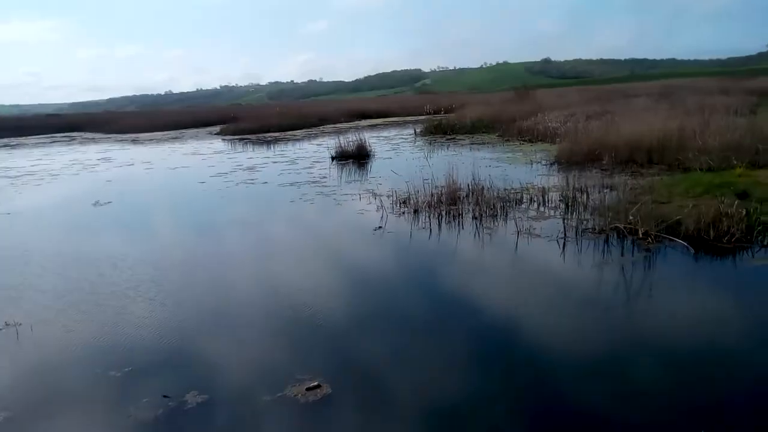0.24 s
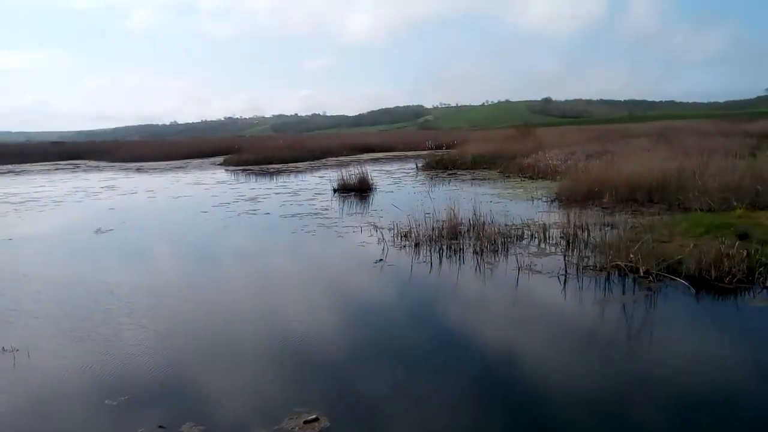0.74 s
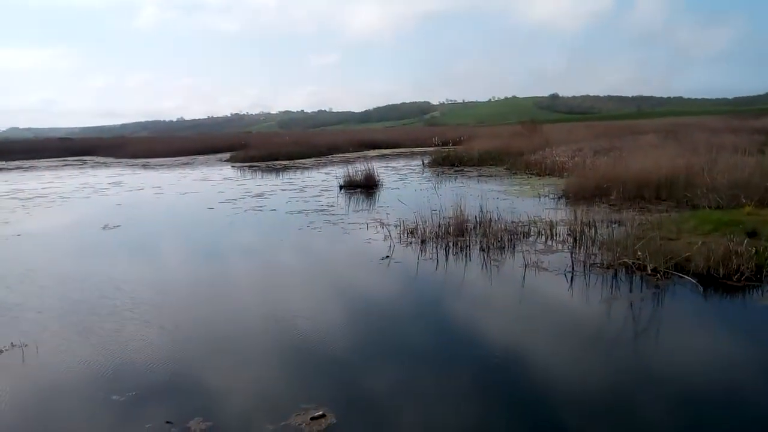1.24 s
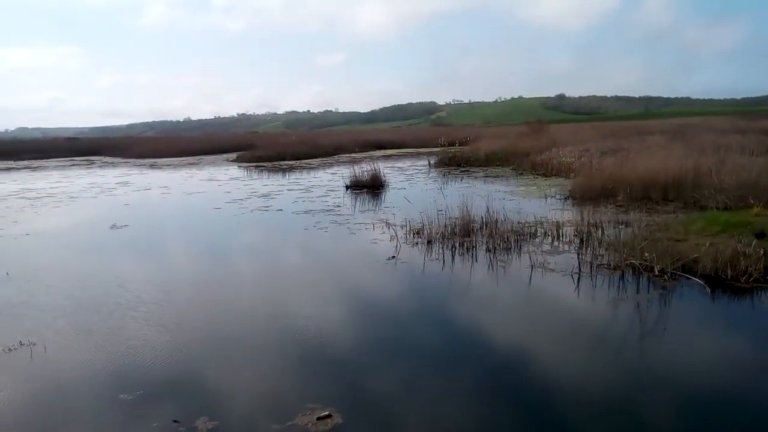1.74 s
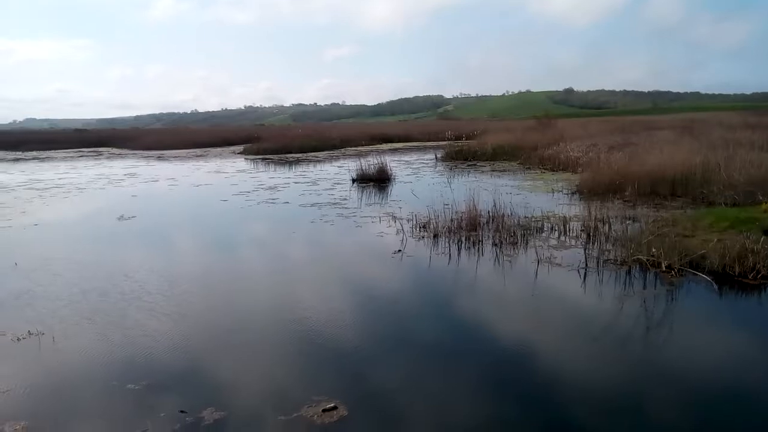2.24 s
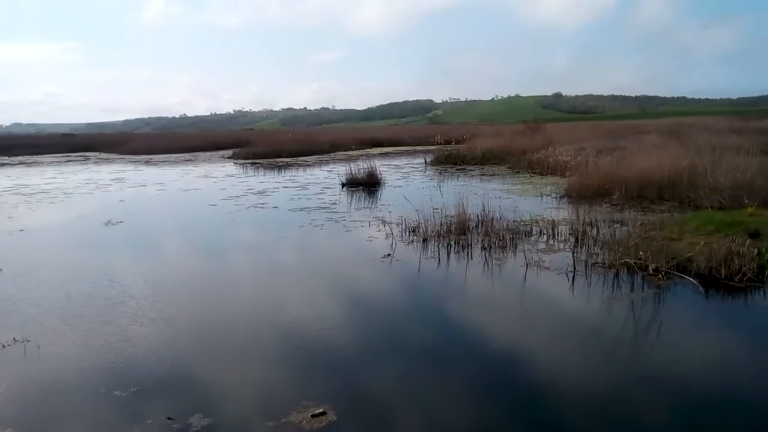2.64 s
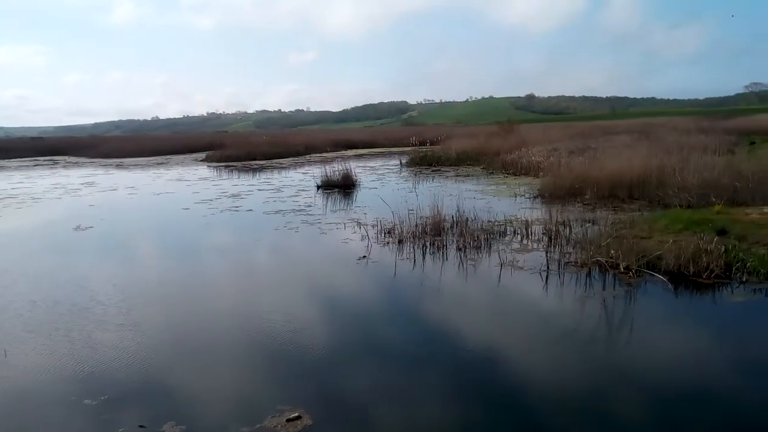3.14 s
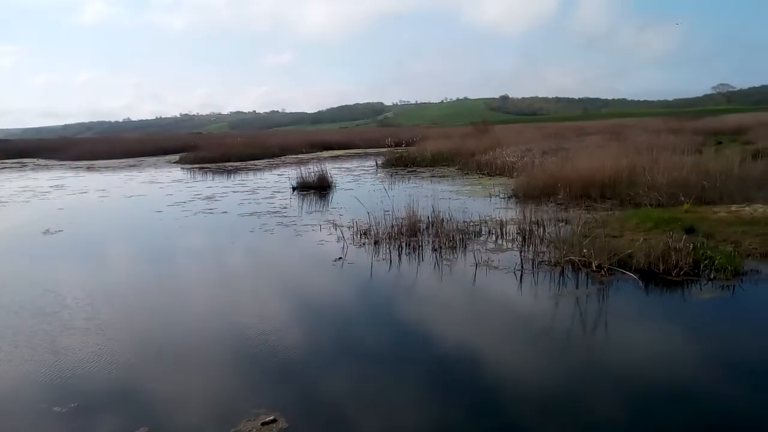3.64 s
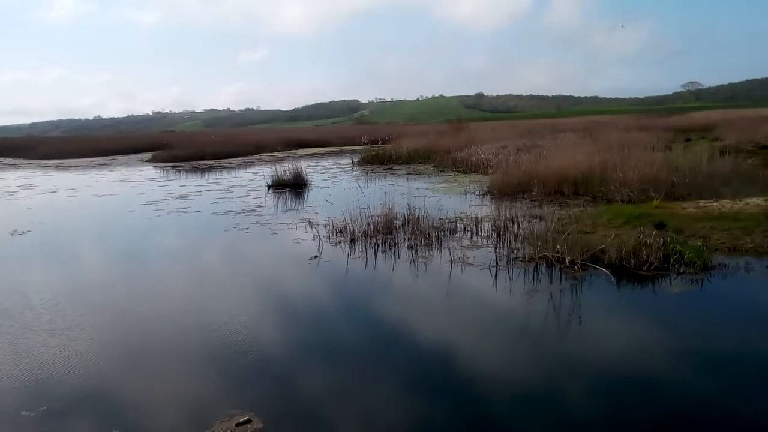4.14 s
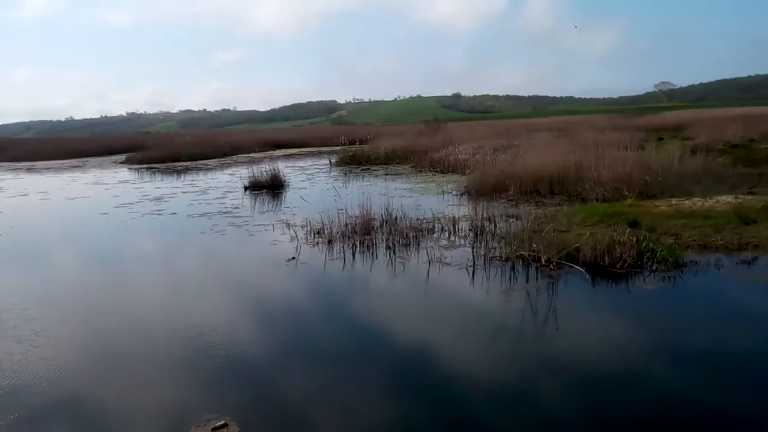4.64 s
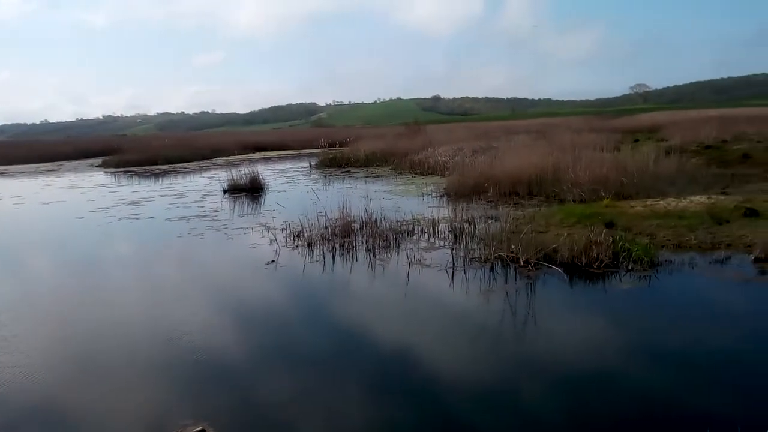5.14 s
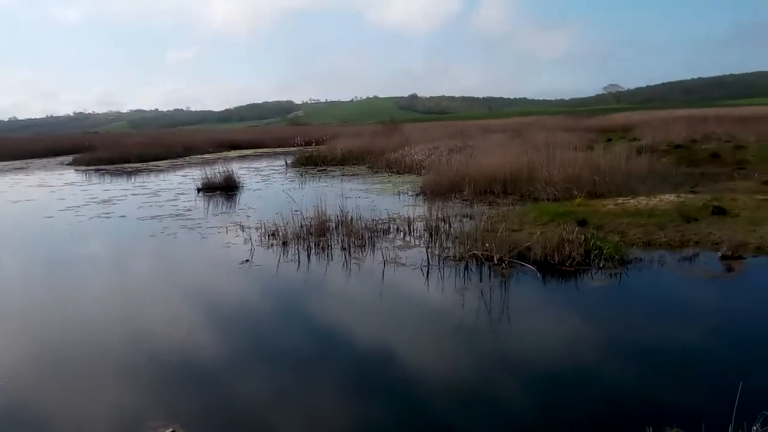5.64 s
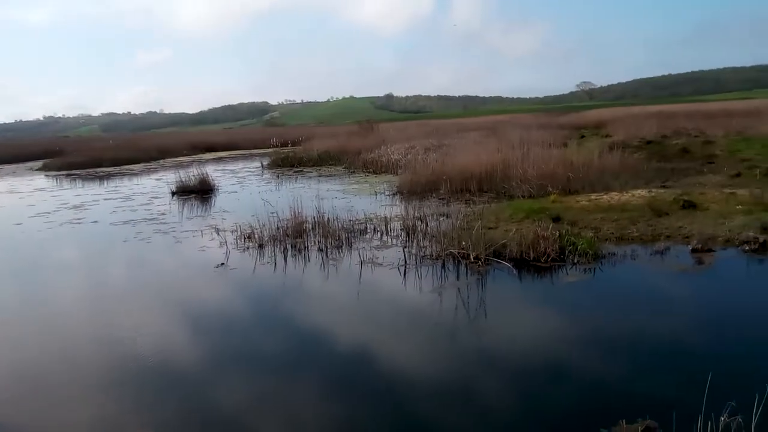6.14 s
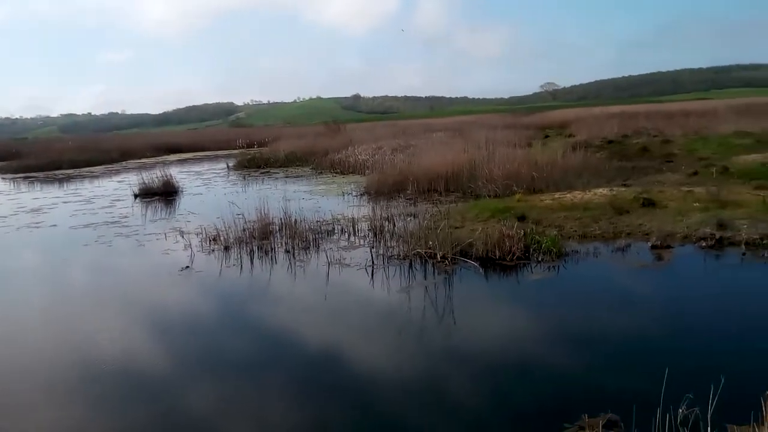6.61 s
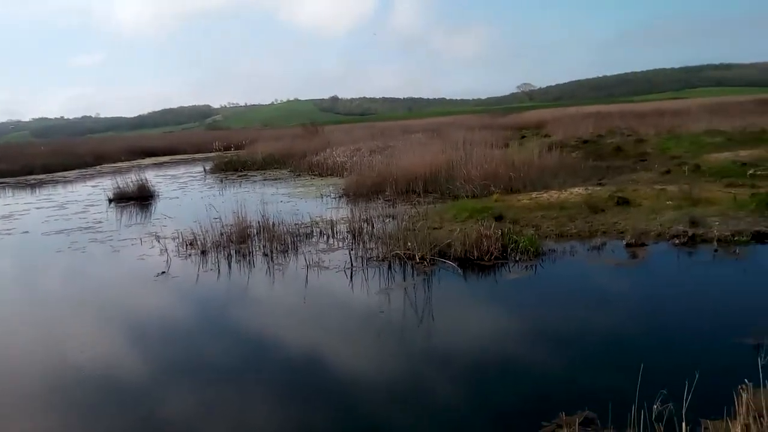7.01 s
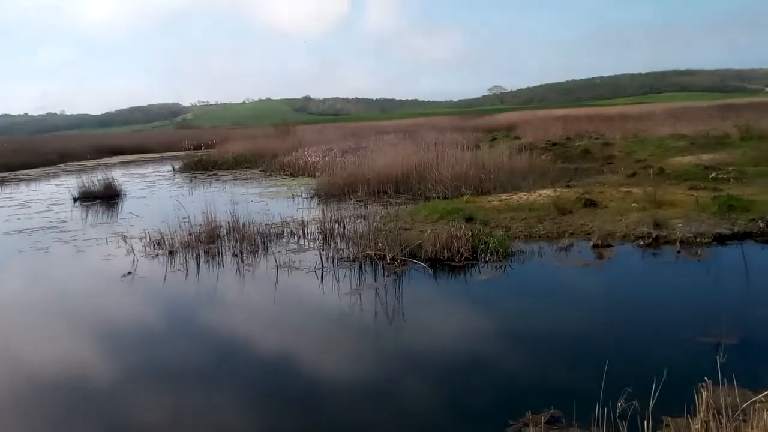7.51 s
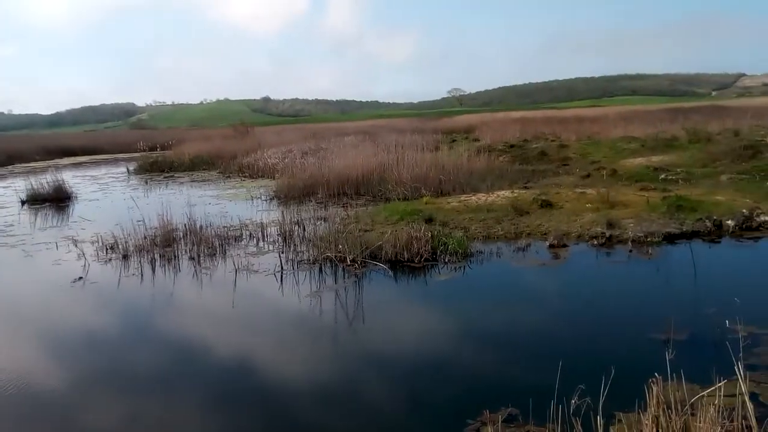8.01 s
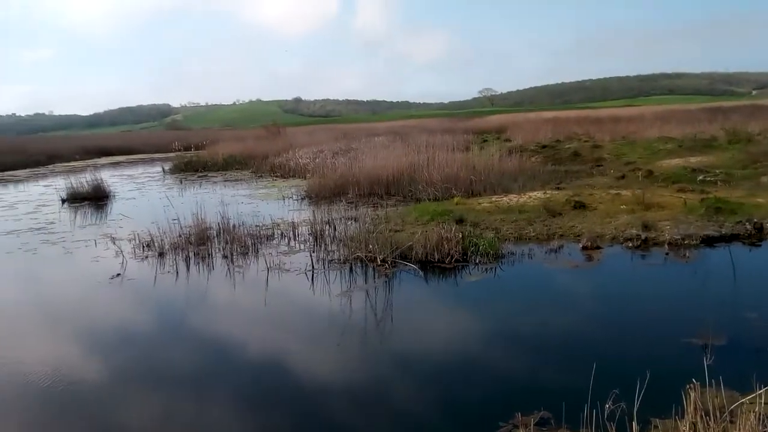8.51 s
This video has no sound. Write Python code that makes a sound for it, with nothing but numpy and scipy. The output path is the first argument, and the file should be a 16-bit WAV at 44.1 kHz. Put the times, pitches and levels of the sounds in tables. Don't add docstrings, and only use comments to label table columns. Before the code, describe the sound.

A dense frog chorus fills an open, reedy pond from start to end. Near frogs rattle in series of short, dry, pulsed notes, roughly twelve a second, bright around four kilohertz with a hollow throaty ring. Smaller frogs add slightly higher notes and faint husky whistles, and short croaks climb quickly in pitch and stop abruptly. A thin rising peep sounds at about 2.2 seconds. Behind, countless distant callers merge into fluttering drone and buzz, with soft scattered echoes. Wind buffets the small microphone: low rumbling gusts in the first 1.3 seconds, a calmer stretch to about 2.6, light bumps, then heavy thudding gusts from 3.8 to 5. More blows come at 5.2 to 6.1, strongest near 5.8. After an easier spell, the hardest jolts hit around 7.85, with another near 8.3. The limiter ducks the frogs at the worst peaks, with tiny electronic ticks. Chorus continues to 8.8.

```python
import sys
import numpy as np
from scipy import signal
from scipy.fft import rfft, irfft, next_fast_len
from scipy.io import wavfile
from scipy.ndimage import uniform_filter1d, minimum_filter1d, map_coordinates

SR = 44100
rng = np.random.default_rng(int(sys.argv[2]) if len(sys.argv) > 2 else 0)


def master(y):
    cut = np.clip(np.atleast_2d(y).T, -1, 1)
    pcm = np.round(cut * 32767)
    wavfile.write(sys.argv[1], SR, pcm.astype(np.int16))


def convert_level_to_amplitude(level_db):
    exponent = np.asarray(level_db, float) / 20
    return 10 ** exponent


N = 386757

# [first note t/s, last note t/s, gap/s, first level/dB, last level/dB]
LEADER_SERIES = [(0.018, 0.28, .082, -42.5, -40), (0.365, 0.68, .079, -48.5, -44),
                 (0.831, 1.086, .086, -51, -39), (1.182, 1.4616, .094, -35, -32),
                 (1.596, 2.14, .079, -38.5, -33), (2.44, 2.66, .073, -32.5, -26),
                 (2.739, 2.899, .079, -27.5, -33.5), (2.948, 3.102, .082, -36.5, -63),
                 (3.294, 3.677, .077, -30.5, -27.5), (3.836, 3.914, .075, -47, -47),
                 (3.988, 4.53, .077, -35, -29.5), (4.572, 4.615, .043, -34.5, -41),
                 (4.705, 4.705, .08, -40, -38), (4.81, 4.965, .078, -35, -33),
                 (5.043, 5.523, .08, -32.5, -29.5), (5.569, 5.95, .076, -36.5, -47),
                 (6.015, 6.204, .093, -48, -51), (6.266, 6.63, .073, -40.5, -34.5),
                 (6.67, 7.012, .085, -36, -30.5), (7.09, 7.25, .08, -43, -48),
                 (7.582, 7.97, .077, -40.5, -39.5), (8.034, 8.26, .073, -45.5, -73),
                 (8.331, 8.413, .08, -43, -39), (8.475, 8.723, .083, -39, -40.5)]
BRIGHT_SERIES = [
    (.09, .19, .1, -51, -52),
    (1.6, 1.75, .075, -54, -40),
    (5.362, 5.447, .085, -27.5, -28.5),
    (5.874, 5.95, .076, -49, -45.5),
    (6.55, 6.68, .065, -45, -47),
    (6.755, 7.203, .075, -40, -45),
    (8.41, 8.41, .08, -47, -48),
]
# [t/s, upper resonance f/Hz, then vocal sac, middle, top resonance level/dB re upper]
THROAT_SHAPE = [(.1, 4260, 4.5, -4, -21), (.52, 4520, 8.5, -4, -27), (.9, 4920, 8, -10, -27),
                (1.3, 4300, 2.5, -7.5, -43), (1.62, 4560, 4.5, -1.5, -27), (1.95, 4315, -0.5, -9, -36),
                (2.6, 4378, -3, -10, -44), (3.05, 4366, 5, -4, -38), (3.49, 4352, -5.5, -5, -45),
                (4.18, 4280, -1.5, 1.5, -31), (4.55, 4390, -3, -5, -34), (4.9, 4400, -13, -0.5, -28),
                (5.35, 4330, -2, -9, -37), (5.85, 4388, -11, 2.5, -18), (6.21, 4426, 2.5, 1, -20),
                (6.7, 4283, -6.5, -11.5, -31.5), (7.9, 4460, -6, 2.5, -27), (8.5, 4470, 6.5, 0.5, -27)]
# [first note t/s, last note t/s, first level/dB, last level/dB, f/Hz]
SMALL_SERIES = [(.29, .29, -38, -38, 5100), (.362, .676, -36.5, -37, 4960), (.823, .823, -48, -44, 4850),
                (.909, 1.089, -42.5, -52, 5010), (1.143, 1.143, -40, -45, 4745),
                (1.688, 2.165, -36.5, -30, 4890), (3.026, 3.34, -39, -30.5, 4994),
                (3.425, 3.578, -31, -35.5, 4940), (3.66, 3.66, -35.5, -42, 4790),
                (4.672, 4.747, -38.5, -32.5, 4930), (4.826, 5.148, -28.5, -31.5, 4887),
                (5.23, 5.55, -38, -63, 5067), (5.793, 6.12, -56, -47, 4958), (6.6, 6.685, -42, -44, 5036),
                (8.175, 8.409, -40.5, -43, 4812)]
# [t/s, level/dB, f/Hz]
CLEAR_NOTES = [(.07, -43, 4360), (0.2, -36, 4320), (0.26, -36.5, 3800), (7.06, -33.5, 4320),
               (6.5, -35, 4400), (7.4, -41, 4600), (7.2, -40, 3900), (1, -40.5, 3730), (3.225, -29, 4310),
               (4.7, -36, 4300), (.1, -52, 4800), (1.52, -38, 4200), (2.62, -33, 4450), (2.55, -39, 5130),
               (3.005, -43, 5110), (.065, -42, 3400), (0.21, -47, 3650), (1.9, -41, 4300), (1.7, -38, 4400),
               (4.6, -36, 4600), (3.14, -42, 5470), (2.2, -51, 4700)]
# [first note t/s, last note t/s, level/dB, first f/Hz, last f/Hz]
WHISTLE_SERIES = [(.82, .89, -51, 5520, 5580), (1.205, 1.205, -59, 6570, 6400),
                  (1.275, 1.598, -56, 6510, 5820), (1.67, 1.67, -61, 7970, 8000),
                  (1.83, 2.15, -70, 8670, 8450), (2.51, 2.66, -76, 8740, 8500),
                  (2.74, 2.89, -70, 8340, 8080), (3.3, 3.3, -78, 8900, 8900), (3.37, 3.68, -72, 9000, 8280),
                  (3.611, 3.925, -56.5, 6540, 5900), (4.38, 4.525, -67, 8300, 7980),
                  (4.57, 4.57, -75, 8550, 8550), (4.956, 5.195, -69.5, 8800, 8340),
                  (5.364, 5.448, -59.5, 8100, 8080), (5.52, 5.52, -75, 8370, 8500),
                  (6.03, 6.117, -55, 6500, 6650), (6.192, 6.441, -57, 6370, 5890),
                  (6.752, 6.925, -76.5, 8600, 8900), (7.873, 8.019, -52.5, 6580, 6310),
                  (8.105, 8.262, -53.5, 6290, 6100)]
# [start t/s, length/s, level/dB, first f/Hz, last f/Hz]
PEEPS = [
    (2.245, 0.096, -40, 2110, 2300),
    (3.3, 0.033, -38, 1900, 2000),
    (4.855, .035, -62, 3550, 3100),
    (3.5, .05, -46, 2600, 3900),
]
# [start t/s, level/dB, length/s, start f/Hz, end f/Hz]
CROAKS = [(.3, -31, 0.17, 1160, 1760), (.66, -34, 0.063, 1700, 1850), (8.65, -32.5, 0.09, 1950, 1900),
          (7.24, -35, 0.075, 1800, 1910), (8.1, -31, .3, 1247, 1352), (.55, -25, 0.086, 1610, 1746),
          (.8, -29, 0.11, 1780, 2070), (.99, -29, 0.13, 1175, 1870), (1.58, -27.5, 0.17, 1130, 1830),
          (2.35, -27.5, 0.14, 1471, 1893), (2.55, -30.5, 0.075, 1020, 1810), (3.22, -36, 0.18, 1050, 1370),
          (3.38, -25.5, 0.11, 1428, 1805), (3.67, -24, 0.067, 2480, 2190), (3.95, -27, 0.12, 1416, 1868),
          (5.25, -32, 0.18, 1214, 1391), (5.47, -29, 0.066, 1202, 1455), (5.79, -33.5, 0.15, 1196, 1849),
          (6.1, -28.5, 0.12, 1195, 1497), (6.41, -29, 0.12, 1640, 1984), (6.8, -28, 0.12, 1382, 1952),
          (7.12, -34, 0.12, 2270, 2065), (6.97, -22.5, 0.059, 1750, 2005), (7.52, -25.5, 0.152, 1199, 1910),
          (5.68, -34, 0.059, 1607, 1792), (6.25, -36.5, .12, 1644, 1850), (6.6, -31, 0.043, 1800, 1903),
          (8.02, -33, .07, 2140, 1600), (7.93, -36, 0.033, 2100, 2150), (8.1, -35, 0.031, 2106, 2150),
          (6.88, -29, 0.084, 1730, 1900), (8.13, -25, 0.11, 1114, 1884), (8.3, -31, 0.1, 1134, 1491)]
# [t/s, croaking level/dB, rattling level/dB]
FAR_LEVELS = [(0, -34, -40), (.96, -39.5, -43), (1.63, -34, -39), (2.06, -39.5, -44.5), (2.45, -34.5, -41),
              (3.09, -38.5, -44.5), (3.3, -36.5, -41), (3.66, -38.5, -41), (3.8, -36.5, -44.5),
              (4.25, -37.5, -50.5), (5.0, -37, -35.5), (6.03, -38, -45.5), (6.99, -36, -42),
              (7.38, -40, -52.5), (7.65, -33.5, -42), (7.86, -39.5, -50), (8.14, -34, -46.5),
              (8.76, -38.5, -42)]
# [f/Hz, level/dB]
DRONE_SPECTRUM = [(330, -34.5), (480, -6.5), (620, -9), (850, -11), (1250, -5), (1750, 1), (2300, -5),
                  (2900, -17.5), (3800, -41.5)]
# [f/Hz, level/dB]
BUZZ_SPECTRUM = [(2600, -31.5), (3300, -4), (4300, -4.5), (5200, -6.5), (5800, -13.5), (6600, -17),
                 (7600, -26), (8500, -53)]
# [t/s, buffet level/dB]
BREEZE_LEVELS = [(0, -37.5), (.3, -40), (.65, -35), (1.05, -42), (1.6, -38), (1.93, -54), (2.5, -44),
                 (3.3, -40), (3.7, -33), (4.9, -35.5), (5.13, -37.5), (5.5, -32.5), (6.3, -38.5),
                 (7.2, -40), (7.8, -33.5), (8.76, -33.5)]
# [start t/s, hold/s, buffet level/dB, sharp part level/dB re
GUSTS = [(0, 0.19, -25, -9.5), (0.494, 0.063, -33, -10), (0.692, 0.11, -26, -13), (0.891, 0.033, -32, -19),
         (1.126, 0.0497, -25, -12), (1.258, 0.37, -35, -15), (2.618, 0.04, -30, -21),
         (2.743, 0.048, -30, -15), (2.993, 0.072, -28, -16), (3.385, 0.12, -28, -13),
         (3.789, 0.07, -20, -7), (3.878, 0.17, -17, -5.5), (4.089, .17, -13.5, -6.5),
         (4.272, 0.058, -20, -21), (4.355, 0.086, -17, -18), (4.474, 0.053, -22, 0.5),
         (4.592, .23, -23, -11), (5.184, 0.22, -28, -13), (5.581, 0.035, -25, -14),
         (5.713, .05, -21.5, -9.5), (5.776, 0.11, -15.5, -9), (5.915, .11, -22.5, -9.5),
         (6.107, 0.041, -24.5, -10.5), (7.078, 0.019, -29.5, -8), (7.447, 0.062, -32.5, -14),
         (7.816, 0.13, -19, -1.5), (8.135, 0.091, -27.5, -15.5), (8.33, 0.086, -20, -4),
         (8.476, 0.051, -28, -18),
         (0.114, 0.047, -23, -9), (0.575, 0.057, -32, -9.5), (0.843, 0.042, -35, -16),
         (1.249, 0.069, -30, -6), (1.354, 0.13, -28.5, -13), (1.517, 0.022, -32, -6.5),
         (1.574, 0.038, -30, -16), (1.713, 0.031, -40, -16), (1.789, 0.036, -38, -17),
         (2.077, 0.1, -39, -18), (2.305, 0.065, -39, -22), (2.41, .14, -37, -28), (3.459, .045, -31.5, -5),
         (2.7, 0.021, -32, -15), (3.105, 0.017, -33, -13), (3.154, 0.019, -33, -15),
         (3.253, 0.026, -36, -10), (3.544, 0.028, -33, -15), (3.638, 0.093, -31, -21),
         (4.543, 0.043, -22, -6.5), (4.624, 0.0302, -16, -6), (4.688, 0.051, -19, -7),
         (4.775, 0.046, -19, -8), (4.877, 0.013, -29.5, -14.5), (5.104, 0.025, -32, -14.5),
         (5.176, 0.057, -22, -14), (5.276, 0.021, -24, -17), (5.329, 0.031, -23, -6),
         (5.42, 0.067, -30, -12), (6.02, .022, -23.5, -9), (6.465, .047, -34, -19),
         (6.799, 0.038, -37.5, -19), (6.999, 0.036, -32.5, -18), (7.571, 0.048, -29.5, -16),
         (7.692, .035, -31, -10), (8.606, 0.057, -32, -12.5), (8.722, 0.056, -32.5, -19)]
# [t/s, peak level/dB, f/Hz]
JOLTS = [(.08, -20, 180), (.145, -17.5, 150), (2.635, -27, 150), (3.02, -24, 149), (3.41, -22, 150),
         (3.47, -25, 160), (3.815, -10.5, 227), (3.828, -11.5, 200), (3.915, -11.5, 190), (3.944, -10, 170),
         (4.02, -6.5, 189.8), (4.035, -10, 230), (4.095, -15, 230), (4.111, -7, 170), (4.165, -14.5, 220),
         (4.19, -8.5, 221), (4.238, -6, 180), (4.252, -4.5, 170), (4.408, -11.5, 149), (4.486, -19.5, 240),
         (4.504, -3.5, 242.5), (4.615, -15, 220), (4.64, -6, 150.4), (4.73, -15.5, 189.7),
         (4.805, -14, 210), (5.196, -20, 180), (5.274, -26.5, 159), (5.33, -22, 150), (5.602, -24, 140),
         (5.718, -18.5, 169), (5.785, -13.5, 160), (5.801, -4.5, 209), (5.955, -19.5, 200),
         (6.024, -22, 188.7), (6.12, -23, 170), (7.09, -22.5, 191), (7.843, -4.5, 201), (7.858, -1, 189),
         (7.872, 0, 193), (7.901, -8.5, 170), (7.915, -11, 170.3), (7.956, -16, 210), (8.36, -14.5, 165)]
# [f/Hz, level/dB]
BUFFET_SPECTRUM = [(20, -21), (45, -8.5), (75, 2.5), (110, 1.5), (160, -3), (230, -15), (400, -45.5)]
# [f/Hz, level/dB]
SHARP_SPECTRUM = [(120, -0.5), (220, 2.5), (320, -8), (500, -15.5), (800, -26), (1200, -39)]
# [f/Hz, level/dB]
RUMBLE_SPECTRUM = [(110, -23.5), (200, -13), (330, -12.5), (440, -3.5), (620, 0), (900, -9.5),
                   (1200, -18.5)]
# [f/Hz, level/dB]
HISS_SPECTRUM = [(300, -0.5), (9000, -8.5), (12000, -8.5), (13700, -11.5), (14500, 2), (15500, 0.5)]
# [t/s, peak level/dB]
TICKS = [
    (3.813, -38),
    (4.013, -40),
    (4.192, -39),
    (4.232, -48),
    (4.252, -37),
    (4.8, -44),
    (6.664, -36),
]

SWELL_DB, SWELL_NOTES, UNEVEN_DB = 3.5, 1.56, 0.95
NOTE_GAP_S = 0.08
GUST_RISE_DB_PER_S, GUST_FALL_DB_PER_S, BREEZE_SHARP_DB = 901, 700.5, -16.5
GUST_EVENNESS = 0.3
RUMBLE_DB = -53.5


def rattle(rows, bright_db):
    s, done, swell_db, _, first_db, last_db = series(rows, np.transpose(rows)[2])[:, :, None]
    db = first_db + (last_db - first_db) * done + swell_db
    at, *shape = np.transpose(THROAT_SHAPE)
    upper_hz, sac_db, mid_db, top_db = (np.interp(s, at, column) for column in shape)
    t, u = train(s - .028, .056, rate=385, jitter=.028, slowing=.24, count=22)
    size = convert_level_to_amplitude(db + 6.5) * np.sin(np.pi * u ** 0.85) ** 1.33
    size = size * scatter(u, 2.5 * u)

    def spread(hz):
        return hz * rng.standard_normal(s.shape)

    sound = rings(t, size, upper_hz * (1.015 - 0.041 * u) + spread(40), life=0.001, sag=0.0073)
    size = size * np.sin(np.pi * u) ** 0.25
    sound += rings(t, size * convert_level_to_amplitude(-4.0) * scatter(s, 1.6), 3800 + spread(80), life=0.0008, sag=0.0089)
    sound += rings(t, size * convert_level_to_amplitude(-15.5) * scatter(u, 3.9), 4900 + spread(85), life=0.0007, sag=0.11)
    sac_size = size * convert_level_to_amplitude(sac_db) * scatter(u, 0.75)
    sac_hz = 2370 - 160 * u + spread(66) + 35 * rng.standard_normal(u.shape)
    sound += rings(t, sac_size, sac_hz, life=0.0011, sag=0.016)
    sound += rings(t, size * convert_level_to_amplitude(mid_db) * scatter(u, 1), 3300 + spread(70), life=0.00057, sag=0.0037)
    top_size = size * convert_level_to_amplitude(top_db + bright_db) * scatter(u, 2.5)
    sound += rings(t, top_size, 6750 + spread(140), life=0.00035, sag=0.05)
    sound += rings(t, size * convert_level_to_amplitude(-46.5) * scatter(s, 3), 14800 + spread(250), life=.0003)
    edge_size = size * convert_level_to_amplitude(-43.5 + .5 * bright_db) * scatter(s, 3.1)
    return sound + rings(t, edge_size, 10600 + spread(400), life=0.00023)


def small_frog():
    s, done, swell_db, first_db, last_db, hz = series(SMALL_SERIES, NOTE_GAP_S)
    db = first_db + (last_db - first_db) * done + swell_db
    hz = hz * (1 + 0.006 * rng.standard_normal(len(s)))
    series_count = len(s)
    s, db, hz = np.hstack([[s, db, hz], np.transpose(CLEAR_NOTES)])[:, :, None]
    rough = np.where(np.arange(len(s)) < series_count, 1, .2)[:, None]
    t, u = train(s - .022, .03 + .016 * rough, rate=520, jitter=.022 * rough, slowing=.38, count=26)
    size = convert_level_to_amplitude(db + 1.5) * np.sin(np.pi * u ** 1.23) ** 0.52
    size = size * scatter(u, (1 + 3 * u) * rough)
    sound = rings(t, size, hz * (1.02 - 0.048 * u), life=0.00096, sag=0.017)
    sound += rings(t, size * convert_level_to_amplitude(1.5), 2350 + 60 * rng.standard_normal(s.shape), life=0.00072)
    sound += rings(t, size * convert_level_to_amplitude(-39), 2.1 * hz, life=.0003)
    sound += rings(t, size * convert_level_to_amplitude(-19.0), 1.3 * hz, life=0.00023)
    sound += rings(t, size * convert_level_to_amplitude(-2.5) * scatter(s, 2.5), 0.815 * hz, life=0.00038)
    return sound + rings(t, size * convert_level_to_amplitude(-1.5) * scatter(s, 2.2), 0.652 * hz, life=0.00047)


def whistles():
    out = np.zeros(N + SR)
    t = np.arange(int(0.046 * SR)) / SR
    u = t / t[-1]
    throb = 1 + .7 * np.sin(2 * np.pi * 335 * t)
    at, done, swell_db, level_db, first_hz, last_hz = series(WHISTLE_SERIES, NOTE_GAP_S)
    for s, db, hz in zip(at, level_db + swell_db, first_hz + (last_hz - first_hz) * done):
        drift, husk = uniform_filter1d(rng.standard_normal((2, len(t))), size=130, axis=1)
        phase = 2 * np.pi * np.cumsum(hz * (1.008 - 0.022 * u) + 900 * drift) / SR
        fundamental = (5700 < hz < 7000) * convert_level_to_amplitude(11) * np.sin(phase / 3)
        tone = throb * (1 + 3 * husk) * np.sin(phase) + fundamental
        out[round((s - .022) * SR):][:len(t)] += convert_level_to_amplitude(db + 3.5) * np.sin(np.pi * u) * tone
    for s, length, db, hz, end_hz in PEEPS:
        u = np.linspace(0, 1, int(length * SR))
        phase = 2 * np.pi * np.cumsum(hz + (end_hz - hz) * u) / SR
        tone = np.sin(phase) + convert_level_to_amplitude(-9) * np.sin(2 * phase)
        out[round(s * SR):][:len(u)] += convert_level_to_amplitude(db) * np.sin(np.pi * u) ** 0.69 * tone
    return out[:N]


def croak(rows):
    s, db, length, hz, top_hz = np.transpose(rows)[:, :, None]
    t, u = train(s, length, rate=215, jitter=.02, slowing=-.5, count=48)
    size = convert_level_to_amplitude(db - 1.5) * np.sin(np.pi * u ** 2.0) ** 0.33 * scatter(u, 2.0)
    climb = .5 * u + .5 * (3 * u ** 2 - 2 * u ** 3)
    sac = rings(t, size, hz + (top_hz - hz) * climb, life=0.0019)
    return sac + rings(t, size * convert_level_to_amplitude(-7.5), 0.974 * hz, life=0.0009)


def series(rows, gap):
    rows = np.asarray(rows)
    gaps = np.round((rows[:, 1] - rows[:, 0]) / gap).astype(int)
    row = np.repeat(np.arange(len(rows)), gaps + 1)
    k = np.concatenate([np.arange(g + 1) for g in gaps])
    u = k / np.maximum(gaps[row], 1)
    first, last, *cols = rows[row].T
    from_end = np.minimum(k, gaps[row] - k)
    swell_db = SWELL_DB * (1 - np.exp(-from_end / SWELL_NOTES))
    swell_db = swell_db + UNEVEN_DB * rng.standard_normal(len(k))
    return np.array([first + (last - first) * u, u, swell_db, *cols])


def train(start, length, rate, jitter, slowing, count):
    length = np.reshape(length, (-1, 1))
    chance = rng.standard_normal((len(start), count + 1))
    tired = np.arange(count) / count
    rough = 1 + 2 * jitter * (.12 + tired) * chance[:, 1:]
    slow = 1 + slowing * (1 + 0.3004 * chance[:, 1:2]) * tired
    gaps = rough * slow / (rate * (1 + .05 * chance[:, :1]))
    t = np.cumsum(np.abs(gaps), axis=1)
    return np.reshape(start, (-1, 1)) + t, np.clip(t / length, 0, 1)


def scatter(like, db):
    return convert_level_to_amplitude(db * rng.standard_normal(like.shape))


def rings(s, gain, hz, life, sag=0):
    s, gain, hz = (np.ravel(v)[:, None] for v in np.broadcast_arrays(s, gain, hz))
    keep = gain[:, 0] > 1e-9
    s, gain, hz = s[keep], gain[keep], hz[keep]
    at = np.ceil(s * SR).astype(int) + np.arange(int(12 * life * SR))
    age = (at / SR - s) / life
    shape = 2 * age ** 2 * np.exp(-age) * (1 - age / 12.5) ** 2
    wave = gain * shape * np.sin(2 * np.pi * hz * life * age * (1 + sag * (1 - age / 4)))
    slot = np.where(at < 0, N, np.minimum(at, N))
    return np.bincount(slot.ravel(), wave.ravel(), N + 1)[:N]


def pond(x):
    t = np.arange(SR // 4) / SR
    tail = rng.standard_normal(len(t)) * convert_level_to_amplitude(-60 * t / .35) * (t > .004)
    return signal.fftconvolve(x, tail / np.linalg.norm(tail))[:N]


def far_chorus():
    drone_db, buzz_db = curves(FAR_LEVELS)
    drone = coloured(rng.standard_normal(N), DRONE_SPECTRUM)
    drone = drone + 0.53 * crowd(1121, 2140, rate=230, life=0.0017, count=330)
    drone = drone + 0.17 * crowd(475, 670, rate=110, life=0.0023, count=120)
    buzz = coloured(rng.standard_normal(N), BUZZ_SPECTRUM)
    buzz = buzz + 1.1 * crowd(2900, 5200, rate=450, life=.0006, count=300)
    flutter_db = 1.5 * wobble(13)
    drone_gain = convert_level_to_amplitude(drone_db + flutter_db[::-1] * 0.74)
    return drone_gain * unit(drone) + convert_level_to_amplitude(buzz_db - 7.0 + flutter_db) * unit(buzz)


def crowd(low_hz, high_hz, rate, life, count):
    s, pick, length = rng.random((count, 3)).T[:, :, None]
    t, u = train(s * N / SR, .04 + .05 * length, rate, jitter=.03, slowing=.4, count=20)
    hz = low_hz + (high_hz - low_hz) * pick
    return unit(rings(t, np.sin(np.pi * u) * scatter(s, 3.1), hz * (1.04 - 0.059 * u), life, sag=0.03))


def wind():
    t = np.arange(0, N, 32) / SR
    gain = convert_level_to_amplitude(curves(BREEZE_LEVELS)[0][::32])
    sharp_gain = gain * convert_level_to_amplitude(BREEZE_SHARP_DB)
    for s, hold, gust_db, sharp_db in GUSTS:
        rise_db = GUST_RISE_DB_PER_S * np.maximum(s - t, 0)
        fall_db = GUST_FALL_DB_PER_S * np.maximum(t - s - hold, 0)
        gust = convert_level_to_amplitude(gust_db - rise_db - fall_db)
        gain = np.maximum(gain, gust)
        sharp_gain = np.maximum(sharp_gain, gust * convert_level_to_amplitude(sharp_db))
    gain, sharp_gain = (np.interp(np.arange(N) / SR, t, g) for g in (gain, sharp_gain))
    lumps = wobble(22)
    passed = np.cumsum((gain / convert_level_to_amplitude(-28)) ** .2)
    eddies = coloured(rng.standard_normal(N), BUFFET_SPECTRUM)
    eddies = map_coordinates(eddies, [passed], order=1, mode="mirror")
    low = unit(convert_level_to_amplitude(3.1 * lumps + 3.2 * wobble(45)) * eddies)
    spikes = convert_level_to_amplitude(np.minimum(6.6 * lumps + 9 * wobble(70), 8)) * rng.standard_normal(N)
    low, sharp = evened(low), evened(unit(coloured(spikes, SHARP_SPECTRUM)))
    low = low + convert_level_to_amplitude(RUMBLE_DB) / gain * coloured(rng.standard_normal(N), RUMBLE_SPECTRUM)
    s, peak_db, hz = np.transpose(JOLTS)
    jolts = rings(s - .003, convert_level_to_amplitude(peak_db + 5.5), hz, life=0.0011, sag=0.73)
    return gain * low + sharp_gain * sharp + jolts


def evened(x):
    power = np.abs(uniform_filter1d(x ** 2, size=2200))
    return unit(x / (power + .01) ** (GUST_EVENNESS / 2))


def unit(x):
    return x / np.sqrt(np.mean(x ** 2) + 1e-20)


def curves(rows):
    s, *cols = np.transpose(rows)
    return [np.interp(np.arange(N) / SR, s, c) for c in cols]


def wobble(rate):
    return map_coordinates(rng.standard_normal(int(N * rate / SR) + 4), [np.arange(N) * rate / SR])


def coloured(x, points):
    m = next_fast_len(N + 8192)
    hz, db = np.transpose(points)
    bin_hz = np.fft.rfftfreq(m, 1 / SR) + 1
    gain_db = np.interp(np.log(bin_hz), np.log(hz), db, left=-120, right=-120)
    return unit(irfft(rfft(x, m) * convert_level_to_amplitude(gain_db), m)[:N])


def scene():
    near = rattle(LEADER_SERIES, bright_db=6.0) + rattle(BRIGHT_SERIES, bright_db=18.5)
    near = near + small_frog() + whistles() + croak(CROAKS)
    return (near + convert_level_to_amplitude(-10.5) * pond(near) + far_chorus() + wind())[None]


def roll_off(x):
    return signal.sosfilt(signal.butter(12, 16860, fs=SR, output="sos"), x)


def record(dry):
    x = dry[0] + convert_level_to_amplitude(-71.5) * coloured(rng.standard_normal(N), HISS_SPECTRUM)
    need = np.minimum(1, 0.32 / (np.abs(x) + 1e-9)) ** 0.64
    hold = minimum_filter1d(need, size=600, origin=200)
    x = x * uniform_filter1d(hold, size=300)
    x = x * np.minimum(1, np.arange(N) / (.004 * SR))
    s, db = np.transpose(TICKS)
    x = x + rings(s, convert_level_to_amplitude(db - 8.0), 11800, life=.00017)
    return roll_off(x[None])


dry = scene()
out = record(dry)
master(out)
```